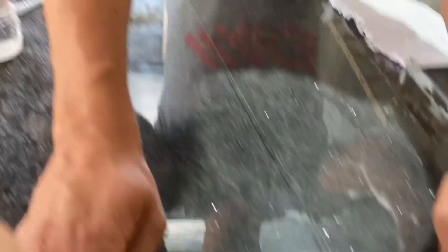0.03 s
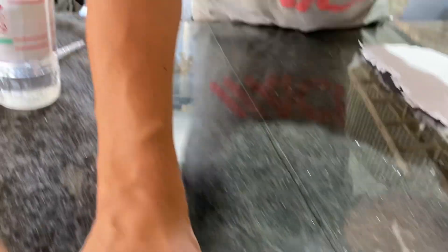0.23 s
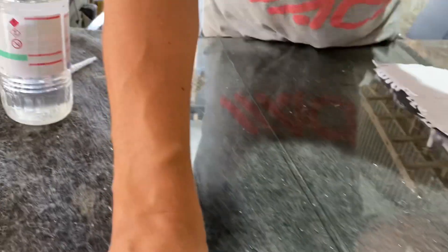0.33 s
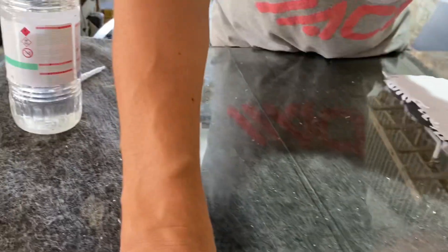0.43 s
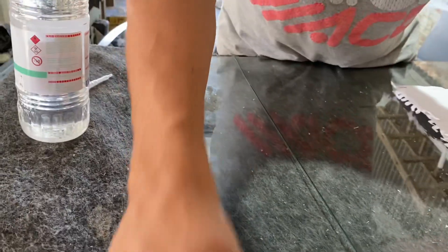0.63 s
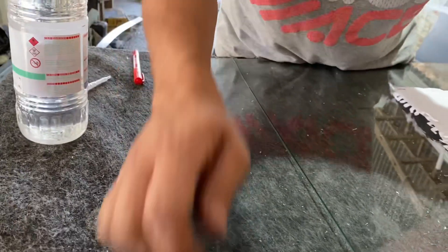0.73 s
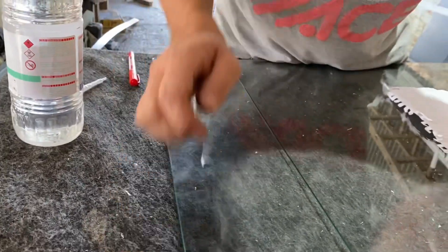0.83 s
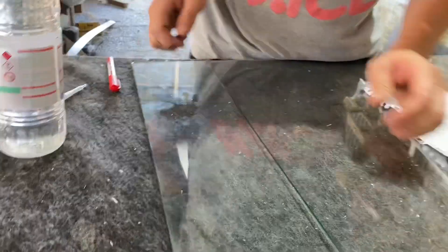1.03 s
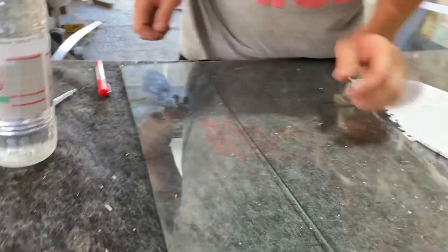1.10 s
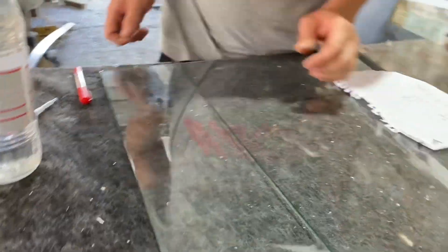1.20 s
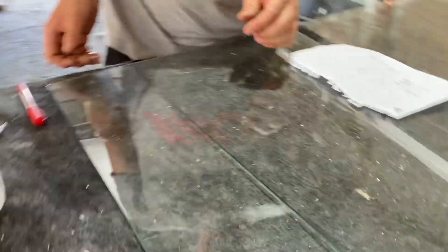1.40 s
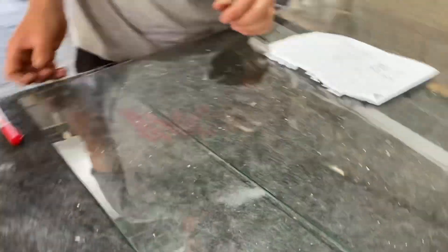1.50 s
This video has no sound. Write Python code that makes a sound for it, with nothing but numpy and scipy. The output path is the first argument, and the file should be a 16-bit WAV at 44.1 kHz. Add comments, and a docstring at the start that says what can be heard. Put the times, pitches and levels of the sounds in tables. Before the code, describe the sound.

A glass sheet snaps with a sharp crack, then its edges click lightly together.

```python
"""A faint throbbing hum and steady air noise are heard first; at once a scored glass sheet snaps close by.
The crack runs in quick jolts, each an impulse that excites the sheet's bending modes. The freed strip
drops back and thumps the felt-covered bench; then the glass edges click together and hands brush over
them with soft friction noise. The small workshop answers with a faint diffuse reverberation."""
import sys
import numpy as np
from scipy import signal
from scipy.fft import rfft, irfft
from scipy.io import wavfile
from scipy.ndimage import uniform_filter1d

SR = 44100
rng = np.random.default_rng(int(sys.argv[2]) if len(sys.argv) > 2 else 0)


def wav_out(sig):
    """Save sig, one row per channel (or a flat mono array), as 16-bit PCM at SR to the path in sys.argv[1]."""
    wavfile.write(sys.argv[1], SR, np.round(np.clip(np.atleast_2d(sig).T, -1, 1) * 32767).astype(np.int16))


N = 68355

# jolts of the break and of the strip landing (time [s], level [dB], tilt [dB/octave])
BREAK_JOLTS = [(0.2229, -18, 1.7), (0.2258, -12, -1), (0.2302, -18.5, -1), (0.2385, -27, -1.5),
               (0.2445, -25.5, -1.5), (0.2558, -29, -0.5), (0.2620, -33.5, -4.5)]
# glass edges touching afterwards (time [s], level [dB], tilt [dB/octave])
EDGE_CLICKS = [(0.5615, -44, -10.5), (1.0342, -41.5, 1), (1.0365, -37, -3), (1.0412, -36.5, -2.5),
               (1.0455, -42.5, 4), (1.1020, -46, -0.5), (1.1042, -38.5, 0.5), (1.1110, -44.5, -0.5),
               (1.1400, -61.5, 5)]
# strongest modes of the sheet (frequency [Hz], level [dB], t60 [s], left minus right [dB])
STRONG_MODES = [(743, -14.5, .14, 5), (890.3, -10.5, 0.1, -3), (976, -12.5, 0.084, 17.5),
                (1073, -10.5, 0.12, 2.5), (1172, -17, 0.15, -8.5), (1484, -18, 0.098, 8),
                (2873, -5, 0.042, 10.5), (3582, -5, 0.036, -1), (3996, -2.5, .038, 0.5),
                (4480, -16.5, 0.14, 7), (5755, -33, 0.043, 3.5), (6664, -17, 0.13, 4.5),
                (7150, -13.5, 0.11, 7), (10535, -20, .08, 0.5)]
# spectral envelope of the dense weaker modes (frequency [Hz], relative level [dB])
DENSE_SPECTRUM = [(150, -6), (300, 2.5), (480, -3.5), (660, -3.5), (950, -0.5), (1400, -1.5), (2100, -7.5),
                  (3700, -4.5), (5300, -5), (7800, -4.5), (10400, -6.5), (13000, -13), (15500, -9.5)]
# brittle noise at each contact (frequency [Hz], relative level [dB])
SNAP_SPECTRUM = [(200, -1), (600, -6.5), (1000, 1), (2000, -7.5), (2900, 5.5), (3900, 3.5), (5600, -6),
                 (8000, -8.5), (10500, -2), (15000, -15)]
# light touches hardly move the low modes (frequency [Hz], gain [dB])
CLICK_FILTER = [(300, -28), (700, -10.5), (950, -15.5), (1350, 2), (2000, 7), (2800, -5.5), (3600, 3),
                (5000, 1.5), (7000, -2.5), (14000, -5.5)]
# stereo balance of the glass clatter (frequency [Hz], left minus right [dB])
CLATTER_BALANCE = [(200, 2), (700, -2.5), (1300, -1), (2400, 8), (4400, 4.5), (8000, 0), (15000, -.5)]
# impacts on the bench (time [s], level [dB])
BENCH_THUMPS = [(0.2240, -22.5), (0.2568, -29), (0.2990, -50), (1.354, -48.5)]
# modes of the bench (frequency [Hz], level [dB], t60 [s])
BENCH_MODES = [(55, -4.5, 0.32), (80.4, -1.5, .18), (128, 1.5, 0.079), (166.4, -4, 0.15),
               (206.7, 0.5, 0.076), (260.6, -6.5, 0.32), (312.8, -8, .2)]
# hands brushing over the glass (start [s], duration [s], level [dB])
BRUSH_STROKES = [(0.493, 0.052, -61), (0.576, 0.12, -63.5), (0.68, 0.57, -68.5), (1.133, 0.144, -73),
                 (1.382, 0.15, -74)]
# friction noise of the hands (frequency [Hz], relative level [dB])
BRUSH_SPECTRUM = [(500, -13), (1500, -5), (4000, 0), (7000, -6.5), (11000, -8), (15000, -16)]
# workshop reverberation (band centre [Hz], level [dB], t60 [s])
ROOM_BANDS = [(200, -21, .5), (500, -14.5, 1), (1000, -17.5, 0.99), (2000, -15.5, .7), (3670, -15.5, .62),
              (6000, -18, 0.72), (10400, -19, 0.27), (13860, -24.5, 0.4)]
# width of the reverberation (frequency [Hz], side minus mid [dB])
ROOM_WIDTH = [(150, -10), (400, -2.5), (1300, -1.5), (7500, -3.5), (9000, -20)]
# envelope of the throbbing hum, before its ceiling (time [s], level [dB])
HUM_THROB = [(0.0, -39.5), (0.082, -56), (0.112, -39), (0.202, -38), (0.228, -37.5), (0.34, -58.5),
             (0.448, -38), (0.47, -51), (0.496, -39), (0.626, -42.5), (0.65, -51), (0.69, -28),
             (0.742, -44), (0.794, -38.5), (0.836, -57), (0.888, -36.5), (0.922, -49), (0.962, -38),
             (1.0, -55), (1.082, -39.5), (1.138, -39), (1.19, -50), (1.29, -35.5), (1.41, -54.5),
             (1.446, -34), (1.55, -48)]
# steady motor tones (frequency [Hz], level [dB])
MOTOR_TONES = [(58, -55), (115.5, -63), (163, -53.5), (173, -52), (231, -68.5), (242, -67), (286, -62.5)]
# air noise (frequency [Hz], relative spectral density [dB])
AIR_SPECTRUM = [(25, -13), (40, -8), (62, 2), (100, -4), (190, -4.5), (290, -11), (380, -18.5),
                (650, -23.5), (850, -18), (1200, -23.5), (1700, -21.5), (2300, -18.5), (3200, -29.5),
                (5000, -36), (8000, -47), (11000, -49.5), (15000, -59.5)]
# width of the air and friction noise (frequency [Hz], side minus mid [dB])
NOISE_WIDTH = [(60, -25), (200, -5.5), (380, -5.5), (1290, 0), (4400, -4.5), (7500, -4.5), (9000, -28),
               (15000, -17)]
# treble lag of the left microphone port (frequency [Hz], phase shift [rad])
LEFT_PORT_PHASE = [(8400, -2.4), (9000, -3.14), (9560, -3.6), (10400, -5.9), (11700, -6.5), (12800, -9.3),
                   (13700, -9.5), (14400, -12.4)]

DENSE_DB, DENSE_T60_S, DAMPING_EXPONENT = -3, 0.11, 0.099  # t60 at 1 kHz, shorter above
SNAP_DB, SNAP_DECAY_S = 2, 0.0027
HUM_HZ, HUM_WAVER, HUM_CEILING_DB = 182.6, 0.02, -34
SWING_PERIOD_S, SWING_PEAK_S, SWING_HZ = 0.192, 0.1645, 6.5  # the hum swings up and down in pitch
PORT_SPREAD, PORT_LAG_FROM_HZ = 0.53, 7400  # spread: chance difference between the two ports
LOW_CUT_HZ, TOP_HZ = 45, 15900


def glass(contacts, t, dense_hz, dense):
    """Impulse response of a plate: each contact gives a brittle snap and a new mixture of free modes."""
    clatter, tones = np.zeros((2, 2, N))
    hz, db, t60, pan_db = np.array(STRONG_MODES).T
    strong = damped_modes(t, hz, t60)
    weight = gain_at(dense_hz, DENSE_SPECTRUM)
    weight = weight / np.sqrt(np.sum(weight ** 2) / 2) * undb(DENSE_DB)
    for start, level_db, tilt_db in contacts:
        phase = 2 * np.pi * rng.random(len(weight)) + PORT_SPREAD * rng.standard_normal((2, len(weight)))
        ring = (weight * excitation(dense_hz, level_db, tilt_db) * np.exp(1j * phase)) @ dense
        noise = rng.standard_normal(len(t)) + PORT_SPREAD * rng.standard_normal((2, len(t)))
        colour = unit(gain_at(freqs(t), SNAP_SPECTRUM)) * excitation(freqs(t), level_db, tilt_db)
        snap = shaped(noise, colour) * np.exp(-t / SNAP_DECAY_S) * undb(SNAP_DB)
        add(clatter, start, ring.imag + snap)
        amplitude = undb([db + pan_db / 2, db - pan_db / 2]) * excitation(hz, level_db, tilt_db)
        phasors = np.exp(2j * np.pi * rng.random(len(hz)))
        add(tones, start, ((amplitude * phasors) @ strong).imag)
    balance = gain_at(freqs(clatter), CLATTER_BALANCE) ** np.array([[.5], [-.5]])
    return shaped(clatter, balance), tones


def excitation(hz, level_db, tilt_db):
    """Force spectrum of a contact: flat below 800 Hz, sloping through its level at 2500 Hz."""
    return undb(level_db + tilt_db * np.log2(np.maximum(hz, 800) / 2500))


def dense_modes(t, count):
    """Constant modal density: the many weak modes of a thin plate are evenly crowded in frequency."""
    hz = (np.arange(count) + 4 + rng.random(count)) * TOP_HZ / count
    t60 = DENSE_T60_S * (hz / 1000) ** -DAMPING_EXPONENT
    return hz, damped_modes(t, hz, t60)


def damped_modes(t, hz, t60):
    """Free vibration: one decaying complex sinusoid per mode."""
    return np.exp(2j * np.pi * hz[:, None] * t) * fade(t, t60[:, None])


def bench(t):
    """Modal superposition: the padded bench booms briefly in low damped modes of alternating sign."""
    thumps = np.zeros((2, N))
    boom = sum((-1) ** k * undb(db) * np.sin(2 * np.pi * hz * t) * fade(t, t60)
               for k, (hz, db, t60) in enumerate(BENCH_MODES))
    for start, level_db in BENCH_THUMPS:
        add(thumps, start, boom * undb(level_db))
    return thumps


def hands():
    """Sliding friction: skin on glass makes broadband noise that swells unevenly with each stroke."""
    t = np.arange(N) / SR
    noise = wide_noise(N, NOISE_WIDTH)
    friction = unit(shaped(noise, gain_at(freqs(noise), BRUSH_SPECTRUM)))
    swell = sum(undb(db) * np.sin(np.pi * np.clip((t - start) / duration, 0, 1))
                for start, duration, db in BRUSH_STROKES)
    return friction * swell * undb(1.3 * drift(rate_hz=56))


def workshop(x):
    """Diffuse reverberation: convolution with noise that decays at its own rate in each band."""
    t = np.arange(SR) / SR
    noise = wide_noise(len(t), ROOM_WIDTH)
    log_centres = np.log([row[0] for row in ROOM_BANDS])
    log_hz = np.log(np.maximum(freqs(t), 1))
    build_up = 1 - np.exp(-t / 0.0039)
    tail = 0
    for (_, db, t60), pick in zip(ROOM_BANDS, np.eye(len(ROOM_BANDS))):
        envelope = fade(t, t60) * build_up
        band = shaped(noise, np.interp(log_hz, log_centres, pick))
        tail = tail + undb(db) * band * envelope / np.sqrt(np.sum(envelope ** 2))
    return signal.fftconvolve(x.mean(axis=0)[None], tail, axes=1)[:, :N]


def machines():
    """Amplitude and frequency modulation: a hum throbs and swings in pitch among weaker motor tones."""
    t = np.arange(N) / SR
    times, throb_db = np.array(HUM_THROB).T
    throb = undb(np.interp(t, times, np.minimum(throb_db, HUM_CEILING_DB)))
    swing = SWING_HZ * np.cos(2 * np.pi * (t - SWING_PEAK_S) / SWING_PERIOD_S)
    pitch = HUM_HZ * (1 + HUM_WAVER * drift(rate_hz=25)) + swing
    hum = throb * np.sin(2 * np.pi * np.cumsum(pitch) / SR)
    for hz, db in MOTOR_TONES:
        hum += undb(db) * np.sin(2 * np.pi * (hz * t + rng.random()) + 0.37 * drift(rate_hz=5))
    return np.sqrt(2) * hum  # rms to peak amplitude


def air(level_db):
    """Partial coherence: steady air noise is nearly alike at both ports in the bass, wider above."""
    noise = wide_noise(N, NOISE_WIDTH)
    rush = unit(shaped(noise, gain_at(freqs(noise), AIR_SPECTRUM)))
    return rush * undb(level_db + 0.22 * drift(rate_hz=7.8))


def ports(x):
    """Phase delay: the upper treble arrives later at the left microphone port."""
    hz, radians = np.array([(PORT_LAG_FROM_HZ, 0), *LEFT_PORT_PHASE]).T
    lag = np.exp(1j * np.interp(freqs(x), hz, radians))
    return np.array([shaped(x[0], lag), x[1]])


def wide_noise(size, width):
    """Mid-side stereo noise whose width depends on frequency."""
    mid, side = rng.standard_normal((2, size))
    return mid + shaped(side, gain_at(freqs(side), width)) * np.array([[1], [-1]])


def drift(rate_hz):
    """Random steps smoothed by moving averages, at rms 1."""
    hold = int(SR / rate_hz)
    steps = np.repeat(rng.standard_normal(N // hold + 2), hold)
    return unit(uniform_filter1d(uniform_filter1d(steps, hold), hold)[:N])


def undb(db):
    """Decibels to amplitude ratio."""
    return 10 ** (np.asarray(db) / 20)


def gain_at(hz, points):
    """Gain of a (frequency [Hz], level [dB]) curve on a log-frequency axis."""
    knots_hz, db = np.array(points).T
    return undb(np.interp(np.log(np.maximum(hz, 1)), np.log(knots_hz), db))


def freqs(x):
    """Frequencies of the spectrum of x."""
    return np.fft.rfftfreq(x.shape[-1], 1 / SR)


def shaped(x, gain):
    """Linear filtering by one gain per frequency."""
    return irfft(rfft(x) * gain, x.shape[-1])


def unit(x):
    """Normalisation to rms 1."""
    return x / np.sqrt(np.mean(x ** 2))


def fade(t, t60):
    """Exponential decay, 60 dB in t60."""
    return np.exp(-np.log(1000) * t / t60)


def add(out, start, x):
    """Superposition of x on out from a start time in seconds."""
    i = int(start * SR)
    out[:, i:i + x.shape[-1]] += x[..., :N - i]


def scene():
    """Direct and reverberant fields: clatter and thumps fill the room; the strong glass tones stay dry."""
    t = np.arange(SR * 2 // 5) / SR
    sheet = dense_modes(t, count=440)
    clicks = np.array(glass(EDGE_CLICKS, t, *sheet))
    clicks = shaped(clicks, gain_at(freqs(clicks), CLICK_FILTER))
    clatter, tones = np.array(glass(BREAK_JOLTS, t, *sheet)) + clicks
    impacts = clatter + bench(t)
    return impacts + tones + workshop(impacts) + hands() + machines() + air(level_db=-46)


def record(dry):
    """Band limiting: past the two microphone ports, filters cut the deep bass and the top."""
    margin = SR // 10  # lets the filters settle
    heard = ports(np.pad(dry, ((0, 0), (margin, margin)), mode="reflect", reflect_type="odd"))
    low_cut = signal.butter(3, LOW_CUT_HZ, "high", fs=SR, output="sos")
    high_cut = signal.ellip(10, .2, 80, TOP_HZ, fs=SR, output="sos")
    return signal.sosfilt(high_cut, signal.sosfilt(low_cut, heard))[:, margin:-margin]


dry = scene()
out = record(dry)
wav_out(out)
```